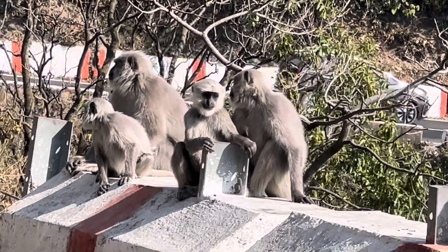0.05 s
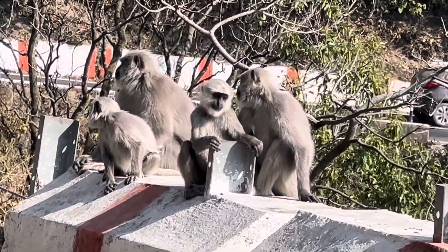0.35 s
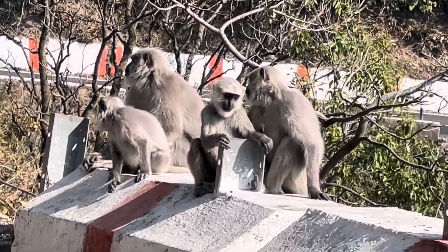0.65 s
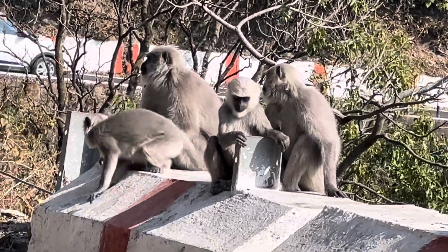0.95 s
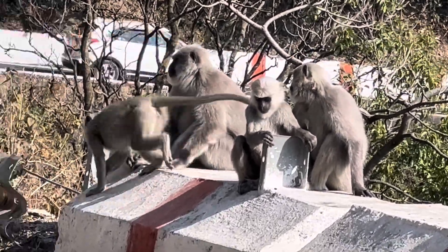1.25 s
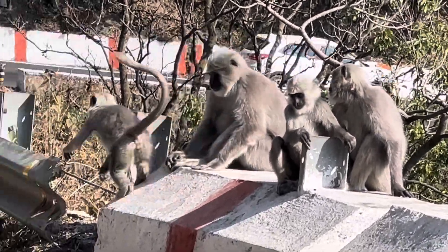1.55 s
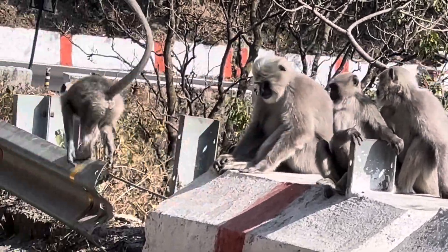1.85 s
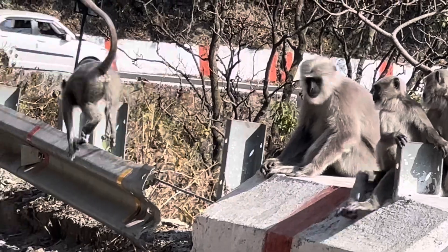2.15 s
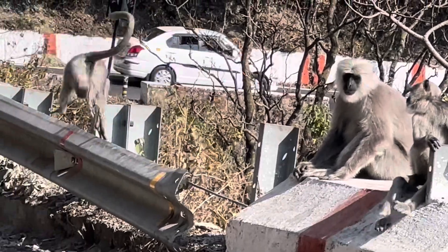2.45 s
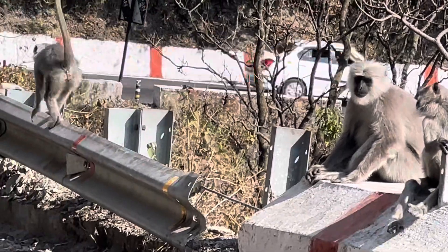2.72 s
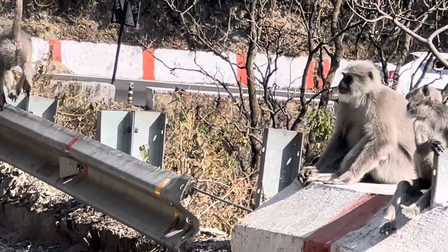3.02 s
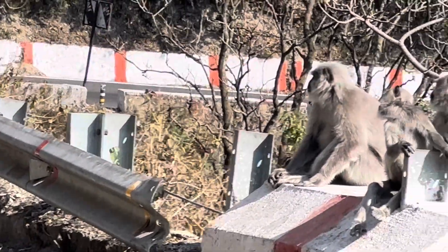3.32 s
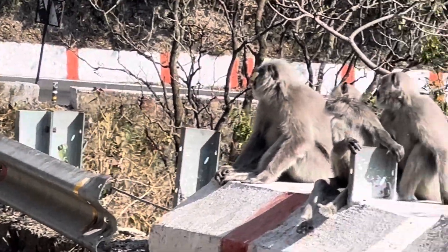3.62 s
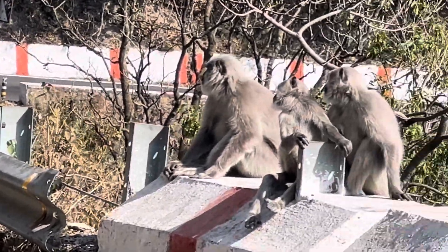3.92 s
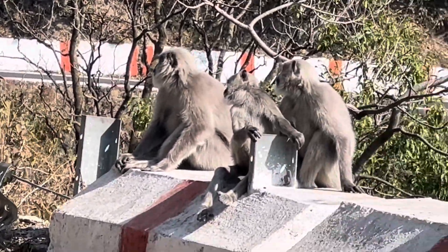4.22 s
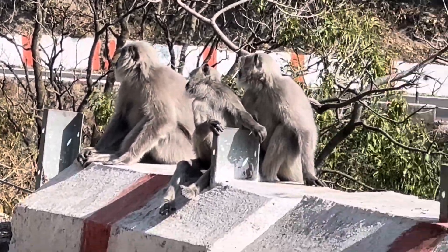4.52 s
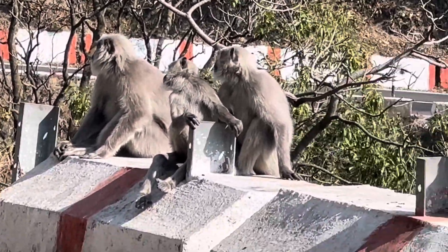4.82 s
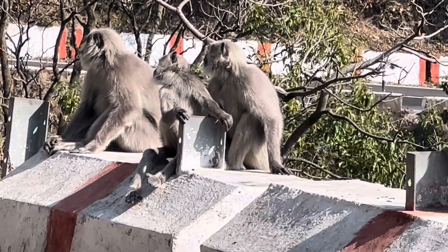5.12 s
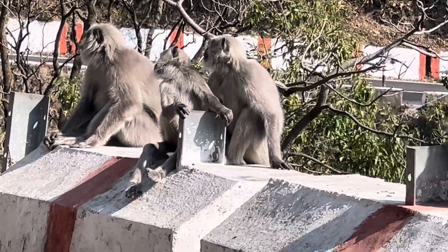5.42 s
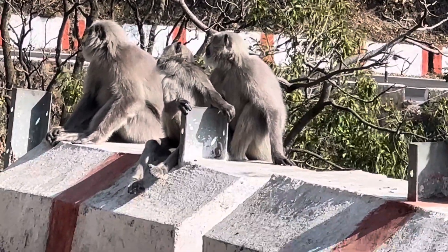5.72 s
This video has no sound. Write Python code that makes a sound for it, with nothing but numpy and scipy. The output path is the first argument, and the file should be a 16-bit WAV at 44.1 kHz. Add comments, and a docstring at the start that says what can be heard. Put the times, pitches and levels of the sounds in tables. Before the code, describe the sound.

Beside a hill road, traffic rumbles softly and a faint far-off whistle sounds. Cars roll by one after another, their tyres roaring and hissing louder each time, while dry grass rustles and twigs or grit tick at the verge. Then a car with a droning, growling engine passes close and leaves to the right, as gusts of wind buffet the microphone with low thuds.

```python
"""A car with a droning four-cylinder engine climbs a hill road, passes close by and leaves to the right.
Its firing pulses make low hum tones with a growl on top. Other cars roll by before it, one after
another: their tyres roar and hiss over a deep rumble, louder as each car comes near.
At the verge, gusts buffet the microphone, dry grass rustles and there are ticks, as of twigs and grit.
Early on come a faint far-off whistle and a few hollow swells, as of brushed sheet metal."""
import sys
import numpy as np
from scipy import signal
from scipy.fft import rfft, irfft, next_fast_len
from scipy.io import wavfile

SR = 44100
rng = np.random.default_rng(int(sys.argv[2]) if len(sys.argv) > 2 else 0)


def file_out(sig):
    """Save sig as 16-bit WAV at sys.argv[1]."""
    # one column per channel
    cols = np.atleast_2d(sig).T
    # limit, then scale
    lim = np.clip(cols, -1, 1)
    pcm = np.round(lim * 32767).astype(np.int16)
    wavfile.write(sys.argv[1], SR, pcm)


N = 258599
TIME = np.arange(N) / SR
FREQS = np.maximum(np.fft.rfftfreq(next_fast_len(N), 1 / SR), 1)

# pulses of the far-off whistle: t/s, half length/s, level/dB
WHISTLE_PULSES = [(.545, .022, -67), (.612, .014, -66), (.685, .038, -62.5)]
# hollow, brushing swells: t/s, half length/s, level/dB
BRUSH_SWELLS = [(.6, .025, -53.5), (1.578, .026, -49.5), (1.688, .014, -49), (1.735, .025, -48)]
# the two notes they ring with: f/Hz, width/Hz, relative level/dB
BRUSH_NOTES = [(1680, 45, -4), (1945, 45, -2)]
# stirs of dry grass: t/s, half length/s, snaps per second, level before filtering/dB
GRASS_STIRS = [(1.8, 0.45, 2700, -43), (2.2, 0.17, 2800, -43), (2.5, 0.15, 1500, -34),
               (2.72, 0.12, 2800, -47), (3.4, 0.21, 3000, -36.5), (3.9, 0.28, 1800, -40.5)]
# dry ticks: t/s, knock level/dB, knock f/Hz, crack level/dB, crack lowest f/Hz, crack highest f/Hz
TWIG_TICKS = [(1.8015, -52, 3500, -35, 2000, 8500), (1.8215, -30.5, 3200, -22.5, 1500, 3900),
              (1.8265, -39, 3100, -29, 2000, 4000), (1.893, -50, 1770, -38, 6000, 10000),
              (1.992, -38, 2070, -37, 1100, 5000), (2.0138, -34, 1650, -23.5, 1200, 7800),
              (2.0825, -35, 2000, -27, 1200, 8500), (2.0845, -26.5, 2200, -24, 1500, 7000),
              (2.0892, -40, 2000, -31, 1500, 9000), (2.401, -40, 1810, -27, 5000, 9500),
              (2.436, -40, 2200, -28.5, 2000, 7000), (2.494, -38, 2200, -26, 1300, 7000),
              (2.518, -42, 2200, -30, 2000, 8500), (2.773, -35, 2000, -31, 1100, 6000),
              (2.7753, -21, 1900, -24.5, 1100, 5500), (3.2795, -32, 2900, -23, 2200, 8500),
              (3.339, -44, 2000, -32, 3500, 9000), (3.4245, -34, 2000, -28, 2500, 6000),
              (3.4758, -32, 2000, -26, 6000, 10000), (3.8835, -19, 1600, -40, 1100, 4000),
              (3.8847, -12.5, 1900, -27, 7500, 14000)]
# gusts on the microphone: t/s, half length/s, level/dB
WIND_GUSTS = [(1.77, 0.077, -43), (2.118, .2, -47), (4.057, 0.14, -47), (4.7, 0.55, -41),
              (5.35, 0.21, -37.5), (5.726, 0.19, -36.5)]
# thuds of wind: t/s, peak level/dB, length/s, final f/Hz, left minus right/dB
WIND_THUDS = [(1.673, -28, 0.019, 77, .5), (1.752, -28, 0.029, 66, 1), (1.803, -22, 0.018, 92, 2),
              (4.403, -26, 0.007, 198, 1.5), (4.407, -16, 0.014, 75, 1.5), (5.305, -24, 0.01, 195, 0),
              (5.314, -22, .014, 85, 0), (5.423, -32, .012, 250, 0), (5.448, -16, 0.018, 165, 1.5),
              (5.470, -21, 0.015, 130, 0), (5.556, -21, 0.018, 58, -.5), (5.603, -30, .012, 185, 0),
              (5.618, -22.5, 0.022, 68, -3.5), (5.702, -21.5, 0.02, 100, -3), (5.766, -29, 0.013, 190, 0),
              (5.780, -17.5, 0.019, 128, 1), (5.825, -23, 0.037, 63, -.5)]

# cars going by: nearest t/s, time to drive as far as their gap to the listener/s, relative level/dB
CAR_PASSES = [(.1, 0.54, -25), (1.85, 0.25, -11.5), (2.44, 0.6, -7), (3.33, 0.73, -6), (4.49, 0.88, -0.5)]
# tone colour of the traffic rumble: f/Hz, relative level/dB
RUMBLE_COLOUR = [(15, -31), (25, -18.5), (36, -14), (56, 3.5), (75, 0), (102, -2), (150, -4.5), (200, -11),
                 (300, -36), (600, -70)]
# ringing body panels and tyres: t/s, half length/s, f/Hz, width/Hz, level/dB
BODY_RINGS = [(.15, 0.72, 1990, 380, -55.5), (.2, 0.66, 438, 48, -52), (2.148, 0.68, 255.3, 46, -46),
              (3.164, 0.27, 2448, 500, -47.5), (4.8, 0.85, 162.3, 22, -45)]
# tone colour of the tyres at five places along the road: f/Hz, relative level/dB
COLOUR_DISTANT = [(200, 0), (400, 2), (550, -6.5), (700, -0.5), (900, -6), (1100, -15.5), (1350, -20),
                  (1900, -16.5), (2400, -20.5), (3200, -24), (5500, -33.5), (9000, -43.5), (11500, -65),
                  (14000, -62)]
COLOUR_AHEAD = [(200, 1), (270, -1.5), (400, -4), (550, -11.5), (700, -3), (900, -7.5), (1100, -11.5),
                (1350, -11.5), (1750, -4), (2300, -9), (3200, -25.5), (5500, -36.5), (7000, -46.5),
                (9000, -39.5), (11500, -55), (14000, -70)]
COLOUR_CLOSE = [(200, -0.5), (350, 1.5), (550, -4.5), (800, -3), (1100, -17), (1300, -21.5), (1650, -13.5),
                (2100, -20), (2700, -21.5), (4000, -20), (6000, -29.5), (9000, -33), (11500, -37.5),
                (14000, -41)]
COLOUR_PAST = [(200, 3), (300, -4.5), (400, -8.5), (700, -10.5), (1050, -14.5), (1500, -5.5), (1850, -10),
               (2500, -21), (4000, -27), (6000, -34.5), (9000, -44.5), (11500, -56), (14000, -51)]
COLOUR_GONE = [(200, -2.5), (400, -20), (700, -16), (1100, -22), (1600, -21), (2100, -23), (3000, -33),
               (5500, -42), (9000, -49), (11500, -82), (14000, -75)]
# how tyre noise reaches the two sides: f/Hz, left minus right/dB, left lead/rad, likeness (0 to 1)
STEREO_AHEAD = [(150, -1.5, 0, 1), (500, 2, 0.02, 0.91), (854, 2, 0.46, 0.94), (1100, 2.5, 1.05, 0.65),
                (1460, -4.5, 2.5, 1), (1760, -11, 1.4, 1), (2030, -1.5, -.2, .97), (2500, 1, .5, .92),
                (3200, 1, .5, .85), (3700, 0, .1, .97), (4300, 0, 0, .995)]
STEREO_CLOSE = [(150, 4, 0.5, 1), (504, 1.5, 0.15, 0.97), (895, 5, 0.7, 0.31), (1140, 2, 2, 0.79),
                (1380, -7.5, 2.5, 0.92), (1710, -10.5, 2.6, 0.6), (2000, -0.5, -.3, .85),
                (2900, 1, 0.5, 0.88), (4300, -1, 0, .99)]
STEREO_PAST = [(150, 3, 0.26, 0.56), (350, 1, 1.2, 0.55), (700, 0, 2.26, .68), (1110, -5, 2.3, 0.8),
               (1300, -16, 3.8, 0.54), (1730, -5, 5.4, .8), (2200, 1.5, 6.5, 0.85), (3000, 0.5, 6.1, 0.8),
               (4300, -1, 6.28, .99)]
STEREO_GONE = [(149, -3, 0.5, 0.52), (405, -4, -7, 0.22), (572, -6, -2, .5), (1100, -4.5, -3.5, 0.33),
               (1630, -0.5, -4, 0.53), (2200, 3, -.5, 0.97), (3000, 0, 1, .9), (4300, 4, 1, 0.93)]
# traffic leaves "distant", enters and leaves "ahead", "close" and "past", then reaches "gone": t/s
PLACE_TIMES = [.9, 2.3, 3.5, 4.3, 4.65, 5.0, 5.199, 5.549]
# whine of the nearest car's tyre grooves: t/s, centre f/Hz, level/dB
GROOVE_WHINE = [(1.5, 1766, -78), (3.5, 1740, -53), (4.3, 1680, -43), (4.6, 1585, -49), (4.88, 1540, -40.5),
                (5.03, 1520, -43.5), (5.2, 1550, -39.5), (5.55, 1602, -58), (5.86, 1612, -53)]

# engine speed as firings per second: t/s, f/Hz
FIRING_RATE = [(0, 51), (.8, 52), (1.15, 55.5), (2.3, 57), (2.7, 60), (3.4, 63.1), (3.8, 64.4), (4.3, 65),
               (4.75, 65.7), (5.86, 64.4)]
# the four lowest exhaust tones swell and fade as the car moves: t/s, then level/dB for each tone
HUM_LEVELS = [(0.0, -71, -60, -69, -60.0), (0.75, -52, -50, -59, -61), (1.0, -43, -50.5, -60, -64),
              (1.5, -43.5, -54, -66, -60.0), (2.35, -47.5, -48, -58, -65), (2.73, -38, -40, -41, -52),
              (3.03, -32.5, -53, -42.5, -64), (3.28, -41, -44, -46.5, -56), (3.5, -37, -36.5, -43.0, -62),
              (3.67, -38, -36.0, -44, -52), (3.85, -32, -34, -41, -48), (4.02, -26.0, -43.5, -60, -58),
              (4.2, -23.5, -31, -44, -46), (4.55, -22.5, -30.5, -50, -40), (4.74, -29.0, -28, -34.5, -44),
              (4.9, -29.5, -25, -55, -41), (5.04, -25.5, -32.5, -60, -36.5), (5.2, -22.5, -25.5, -42, -43),
              (5.36, -30, -26.5, -56, -57), (5.53, -39, -38, -38, -43), (5.86, -42, -53, -51, -46)]
# higher exhaust tones, the growl: multiple of the firing rate, relative level/dB
GROWL_TONES = [(4.5, -10), (5, -1), (6, -5), (7, -4.5), (8, -4.5), (9, -10), (10, -11), (12, -12)]
# strength of the growl, before it is dimmed behind the car: t/s, level/dB
GROWL_LEVEL = [(0, -58), (2.35, -55), (2.7, -48), (3.62, -47), (4.13, -41.5), (5.24, -41.5), (5.5, -49)]
# left and right fall out of step in the treble: f/Hz, left lead/rad
TREBLE_LEAD = [(6800, 0), (7450, 3.14), (8000, 6.0), (8800, 6.1), (9900, 4.7), (10700, 3.3), (12300, 3.1),
               (13200, 6.28)]


def from_db(db):
    """Turn decibels into a factor to multiply by."""
    return 10 ** (np.asarray(db) / 20)


def pan(db):
    """Left and right gains, with the left louder by db."""
    return from_db([[db / 2], [-db / 2]])


def rms(x):
    """The typical size of a signal (root mean square)."""
    return np.sqrt(np.mean(x ** 2) + 1e-20)


def in_time(rows):
    """Join a table's points with lines, giving each column at every sample."""
    times, *columns = np.transpose(rows)
    return [np.interp(TIME, times, column) for column in columns]


def in_frequency(rows):
    """Join a table's points with lines, giving each column at every frequency."""
    hz, *columns = np.transpose(rows)
    return [np.interp(np.log(FREQS), np.log(hz), column) for column in columns]


def white():
    """The spectrum of a fresh noise, on average equally strong at all frequencies."""
    return rng.standard_normal(len(FREQS)) + 1j * rng.standard_normal(len(FREQS))


def to_wave(spectrum):
    """Turn a spectrum into samples."""
    return irfft(spectrum, next_fast_len(N))[..., :N]


def drift(rate_hz):
    """A random wobble of typical size 1, mostly slower than rate_hz."""
    slow = to_wave(white() / (1 + (FREQS / rate_hz) ** 2))
    return slow / rms(slow)


def band(x, low_hz, high_hz):
    """Keep what lies between two frequencies."""
    sos = signal.butter(2, [low_hz, min(high_hz, .45 * SR)], "band", fs=SR, output="sos")
    return signal.sosfilt(sos, x + 1e-18)


def bell(s, half_s):
    """A smooth rise and fall that peaks at time s."""
    return np.exp(-((TIME - s) / half_s) ** 2)


def ringing_noise(hz, width_hz, lead=0):
    """A narrow stereo band of noise around a pitch that may move."""
    phase = 2 * np.pi * np.cumsum(hz * np.ones(N)) / SR + lead * np.array([[.5], [-.5]])
    return drift(width_hz) * np.cos(phase) + drift(width_hz) * np.sin(phase)


def whistle(hz=3230, waver_hz=22, flicker=.4):
    """A faint, thin squeak in three short pulses."""
    pitch = hz + waver_hz * drift(24)
    pulses = sum(from_db(db) * bell(s, half_s) for s, half_s, db in WHISTLE_PULSES)
    gain = pulses * np.maximum(1 + flicker * drift(22), 0)
    return gain * np.sqrt(2) * np.sin(2 * np.pi * np.cumsum(pitch) / SR)


def brushes():
    """Brief hollow swells, as of brushed sheet metal, all ringing at the same two pitches."""
    gain = sum(from_db(db) * bell(s, half_s) for s, half_s, db in BRUSH_SWELLS)
    return gain * sum(from_db(db) * ringing_noise(hz, width_hz) for hz, width_hz, db in BRUSH_NOTES)


def grass(bands=8, top_hz=9500, scuff_db=2.0):
    """Dry grass rustles in uneven bursts of tiny snaps, each dealt to a random pitch band."""
    snaps_per_s = sum(rate * bell(s, half_s) for s, half_s, rate, _ in GRASS_STIRS)
    gain = sum(from_db(db) * bell(s, half_s) for s, half_s, _, db in GRASS_STIRS)
    uneven_db = scuff_db * drift(23) + 2.8 * np.minimum(rng.exponential(1, N), 2)
    sizes = gain * from_db(uneven_db) * rng.choice([-1, 1], N)
    clicks = sizes * (rng.random(N) < snaps_per_s / SR)
    dealt = rng.integers(0, bands, N)
    pitches = np.geomspace(2900, 10500, bands)
    snaps = sum(band(clicks * (dealt == k), hz / np.sqrt(2), hz * np.sqrt(2))
                for k, hz in enumerate(pitches))
    return band(band(snaps, 1200, top_hz), 1200, top_hz)


def ticks(rise_s=0.00055, crack_fade_s=0.0042, pan_db=-6, lead=0.55, echo_s=.005, echo_db=-17):
    """Each tick is a bright crack plus a two-note woody knock on the right, with one ground echo."""
    knocks, cracks = np.zeros((2, N)), np.zeros(N)
    age = np.arange(SR // 20) / SR
    swell = age / rise_s * np.exp(1 - age / rise_s)
    for s, knock_db, hz, crack_db, low_hz, top_hz in TWIG_TICKS:
        span = slice(round(s * SR), round(s * SR) + len(age))
        phase = 2 * np.pi * hz * age + lead * np.array([[1], [0]])
        notes = np.sin(phase) + from_db(-9) * np.sin(1.5 * phase)
        knocks[:, span] += from_db(knock_db) * swell * notes
        burst = from_db(crack_db - 60 * age / crack_fade_s) * rng.standard_normal(len(age))
        cracks[span] += band(band(burst, low_hz, top_hz), low_hz, top_hz)
    direct = knocks * pan(pan_db) + cracks
    echo = band(np.roll(direct, round(echo_s * SR), axis=1), 1000, 4500)
    return direct + from_db(echo_db) * echo


def gust_gain():
    """The strength of all the gusts together, added in power."""
    return np.sqrt(sum((from_db(db) * bell(s, half_s)) ** 2 for s, half_s, db in WIND_GUSTS))


def breeze(low_hz=42, high_hz=135, lumpy_db=3.5, calm_db=-62.5):
    """Swirls of air push the microphone's left and right openings in opposite directions."""
    swirls = band(rng.standard_normal(N), low_hz, high_hz) * from_db(lumpy_db * drift(8.3))
    gain = np.hypot(gust_gain(), from_db(calm_db))
    return gain * swirls / rms(swirls) * [[1], [-1]]


def thuds(glide=1.69, glide_s=0.004):
    """A gust strikes each opening with its own strength; the pitch drops as the lows arrive last."""
    out = np.zeros((2, N))
    for s, db, length_s, hz, pan_db in WIND_THUDS:
        age = np.maximum(TIME - s, 0)
        cycles = hz * (age + glide * glide_s * (1 - np.exp(-age / glide_s)))
        swell = 2 * age / length_s * np.exp(1 - 2 * age / length_s)
        out += from_db(db) * pan(pan_db) * swell * np.sin(2 * np.pi * cycles)
    return out


def passing(nearest_s, span_s, falloff=1.65):
    """Gain of a car driving straight by: 1 at its nearest, fading with distance over rough ground."""
    relative_distance = np.hypot(1, (TIME - nearest_s) / span_s)
    return relative_distance ** -falloff


def traffic_gain(near_db, far_db, late_s=0, beam=1, hidden_db=0):
    """Passing cars add in power to the far traffic; a beam below 1 makes each pass shorter."""
    power = sum((from_db(db) * passing(s + late_s, beam * span_s)) ** 2 for s, span_s, db in CAR_PASSES)
    hidden = np.interp(TIME - late_s, [4.585, 5.32], [0, 1])  # the last car slips out of direct line
    return np.hypot(from_db(near_db + hidden_db * hidden) * np.sqrt(power), from_db(far_db))


def rumble(width=.05, lumpy_db=-0.2, gust_boost_db=7):
    """The deep noise of the traffic, swollen by each gust."""
    mid, side = to_wave(np.array([white(), white()]) * from_db(in_frequency(RUMBLE_COLOUR)[0]))
    noise = (mid + width * side * [[1], [-1]]) / rms(mid)
    gain = np.hypot(traffic_gain(near_db=-39.5, far_db=-42), from_db(gust_boost_db) * gust_gain())
    return gain * from_db(lumpy_db * drift(5.0)) * noise


def body_ring():
    """Body panels and tyres ring in narrow bands that swell and fade as cars go by."""
    return sum(from_db(db) * bell(s, half_s) * ringing_noise(hz, width_hz)
               for s, half_s, hz, width_hz, db in BODY_RINGS)


def stereo_noise(colour, stereo):
    """Left and right spectra of a noise that comes from one place."""
    balance_db, lead, alike = in_frequency(stereo)
    alike = np.clip(alike, 0, .99)
    left = from_db(balance_db / 2) * np.exp(.5j * lead)
    ears = np.array([left, 1 / left])
    pair = np.sqrt(1 + alike) * white() + np.sqrt(1 - alike) * white() * [[1], [-1]]
    summed_size = np.sqrt(np.sum(abs(ears) ** 2, axis=0) + 2 * alike * np.cos(lead))
    return from_db(in_frequency(colour)[0]) * ears * pair / summed_size


def tyres(firing_phase, roar_hz=170, rush_hz=1120, hiss_hz=2800, flutter_db=1.0, clatter=0.061):
    """Tyre bodies roar, treads rush and hiss; tone colour and direction change as the traffic moves."""
    places = [(COLOUR_DISTANT, STEREO_AHEAD), (COLOUR_AHEAD, STEREO_AHEAD), (COLOUR_CLOSE, STEREO_CLOSE),
              (COLOUR_PAST, STEREO_PAST), (COLOUR_GONE, STEREO_GONE)]
    above = [1 / (1 + (hz / FREQS) ** 10) for hz in (roar_hz, rush_hz, hiss_hz)]
    zones = [above[0] - above[1], above[1] - above[2], above[2]]  # low, middle and high pitches
    place_at = (np.arange(len(PLACE_TIMES)) + 1) // 2
    parts = np.zeros((len(zones), 2, N))
    for k, (colour, stereo) in enumerate(places):
        share = np.sqrt(np.interp(TIME, PLACE_TIMES, place_at == k))  # each place fades into the next
        noise = stereo_noise(colour, stereo)
        for part, zone in zip(parts, zones):
            wave = to_wave(noise * zone)
            part += share * wave / rms(wave.mean(axis=0))
    roar_gain = traffic_gain(near_db=-34, far_db=-51.5, hidden_db=-1)
    rush_gain = traffic_gain(near_db=-38, far_db=-68, late_s=0.24, beam=0.86, hidden_db=-3.5)
    hiss_gain = traffic_gain(near_db=-45, far_db=-64.5, late_s=0.27, beam=0.82, hidden_db=-14)
    roar = parts[0] * roar_gain * from_db(flutter_db * drift(33))
    rush = parts[1] * rush_gain * from_db(flutter_db * drift(15))
    hiss = parts[2] * hiss_gain * from_db(0.89 * drift(30))
    # close by, each firing adds a beat of engine clatter
    beat = 1 + clatter * hiss_gain / hiss_gain.max() * np.cos(firing_phase)
    return roar + beat * (rush + hiss)


def tread_whine(width_hz=170, pan_db=-10, lead=4.67):
    """Air rings in the tyre grooves of the nearest car; the pitch sags as it goes by on the right."""
    hz, db = in_time(GROOVE_WHINE)
    return from_db(db) * ringing_noise(hz, width_hz, lead) * pan(pan_db)


def engine(firing_phase, rough=0.22, behind_db=-12, lead=0.11, waver_db=0.3, shudder=.025, smear=1.2):
    """Each firing is a pressure pulse of uneven strength: four low tones hum under a wavering growl."""
    phase = firing_phase + lead * np.array([[.5], [-.5]])  # pulses reach the left a little earlier
    hum = 0
    for k, db in enumerate(in_time(HUM_LEVELS), 1):
        # the silencer smears each pulse, so its tones do not all peak together
        hum += from_db(db + waver_db * drift(2.2)) * np.cos(k * phase + smear * (k - 1))
    # the growl spreads forward, so it fades once the car's nose has gone by
    shadow = from_db(behind_db * np.interp(TIME, [4.7, 5.4], [0, 1]))
    growl_db, = in_time(GROWL_LEVEL)
    growl = 0
    for multiple, db in GROWL_TONES:
        strength = shadow * from_db(growl_db + db) * (1 + rough * drift(7.6))
        growl += strength * np.cos(multiple * phase + .3 * drift(3))
    uneven = 1 + shudder * drift(30)
    return -np.sqrt(2) * uneven * (hum * pan(-.5) + growl * pan(.8))


def scene():
    """Add up the traffic, the wind and the small roadside sounds."""
    firing_phase = 2 * np.pi * np.cumsum(in_time(FIRING_RATE)[0]) / SR  # one turn per firing
    traffic = tyres(firing_phase) + tread_whine() + engine(firing_phase) + body_ring() + rumble()
    return traffic + breeze() + thuds() + ticks() + grass() + brushes() + whistle()


def record(dry):
    """The treble narrows to the centre, then left and right fall out of step; the very top is cut."""
    left, right = rfft(np.pad(dry, [(0, 0), (0, next_fast_len(N) - N)], "linear_ramp"))
    mid = (left + right) / 2
    side = (left - right) / 2 / (1 + (FREQS / 3800) ** 10)
    turn = np.exp(.5j * in_frequency(TREBLE_LEAD)[0])
    heard = to_wave(np.array([(mid + side) * turn, (mid - side) / turn]))
    top_cut = signal.cheby2(16, 70, 16200, fs=SR, output="sos")
    return signal.sosfilt(top_cut, heard)


dry = scene()
out = record(dry)
file_out(out)
```